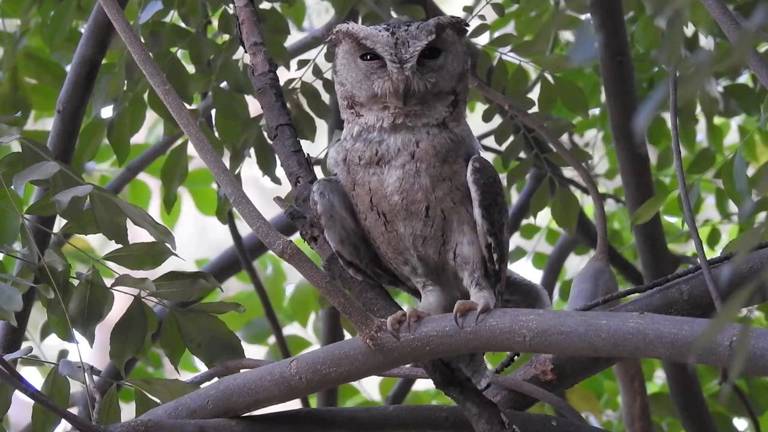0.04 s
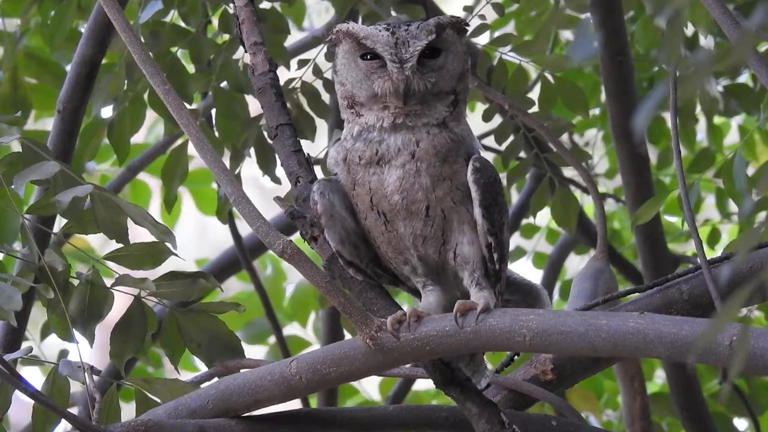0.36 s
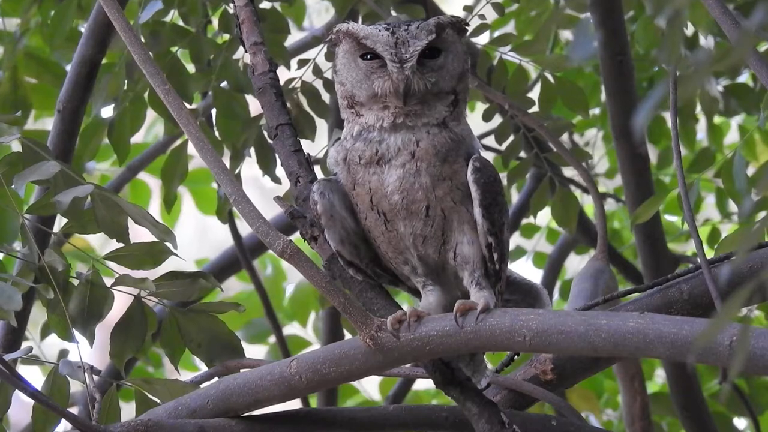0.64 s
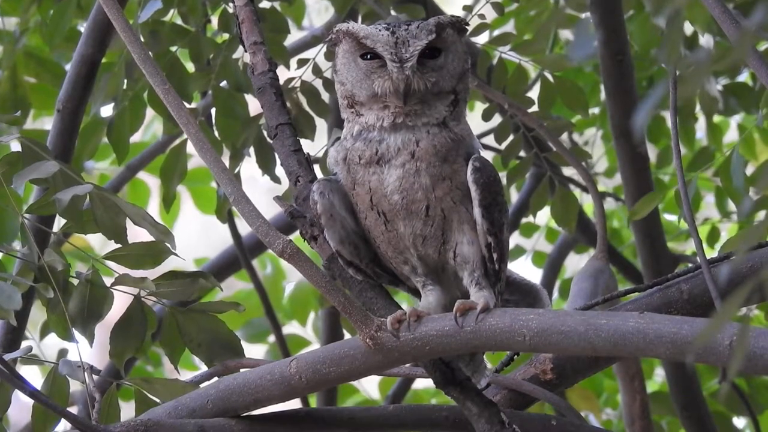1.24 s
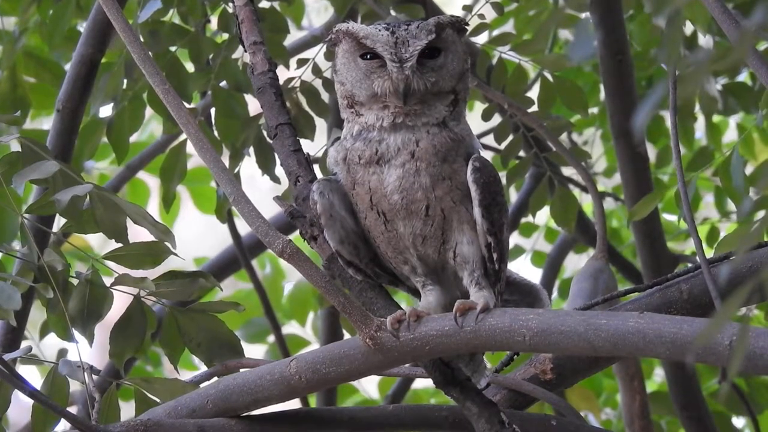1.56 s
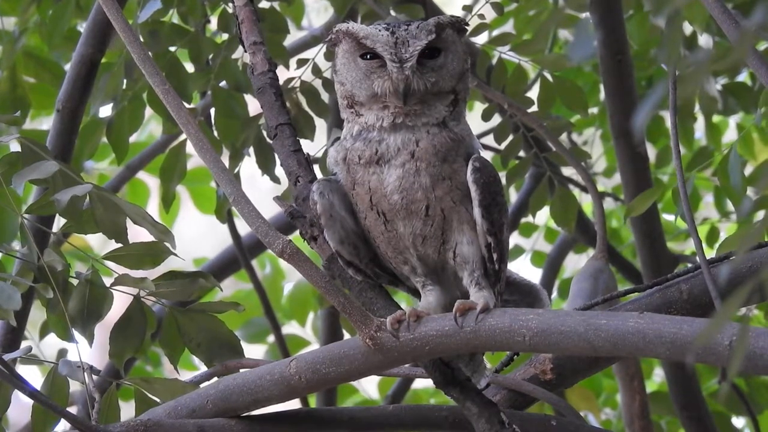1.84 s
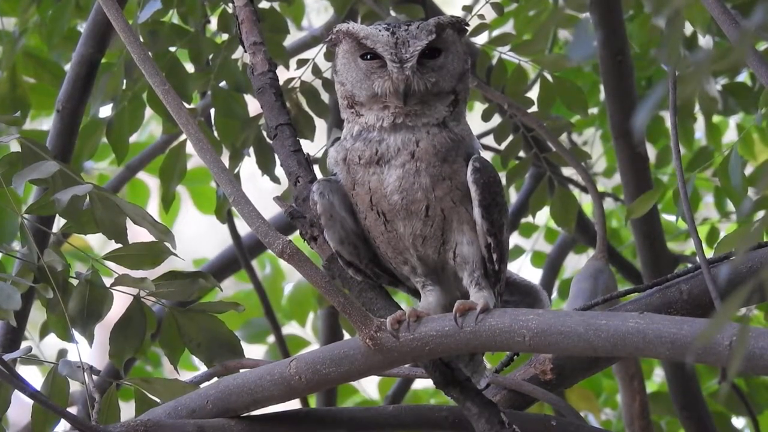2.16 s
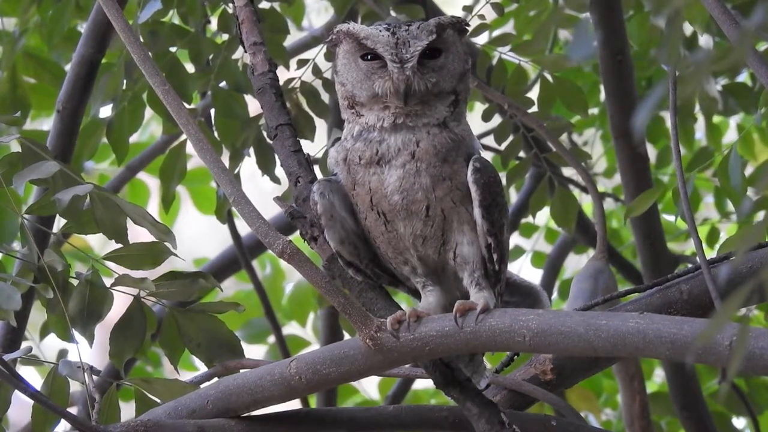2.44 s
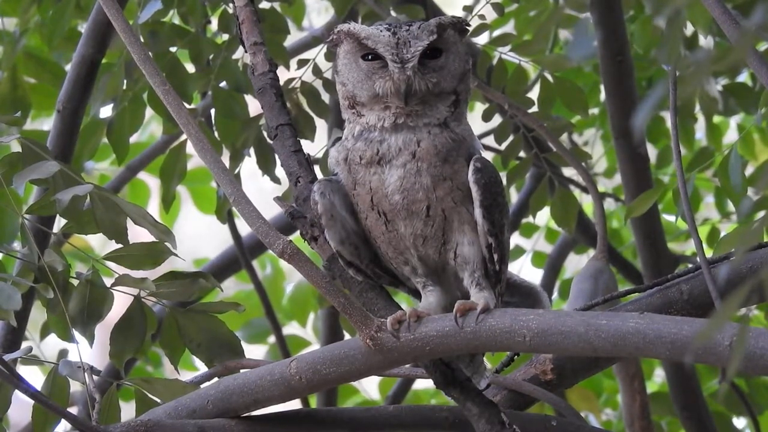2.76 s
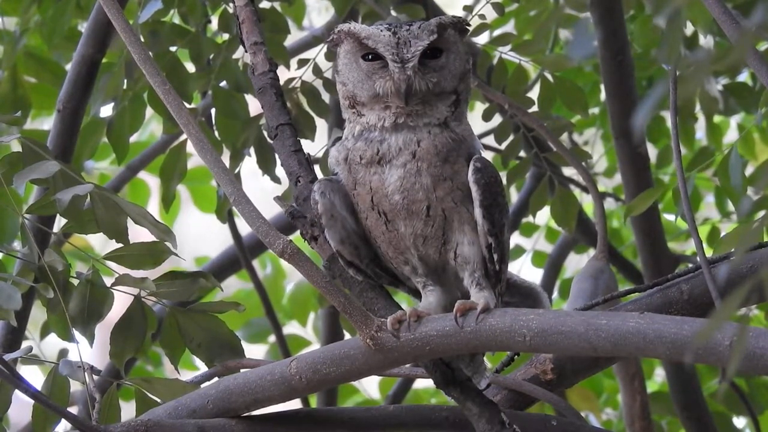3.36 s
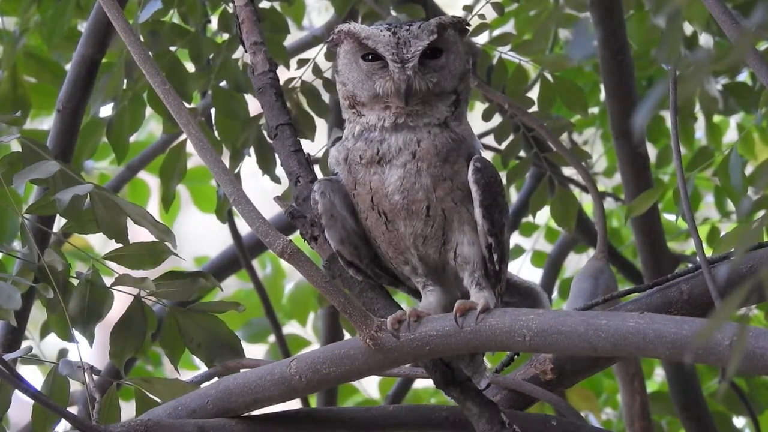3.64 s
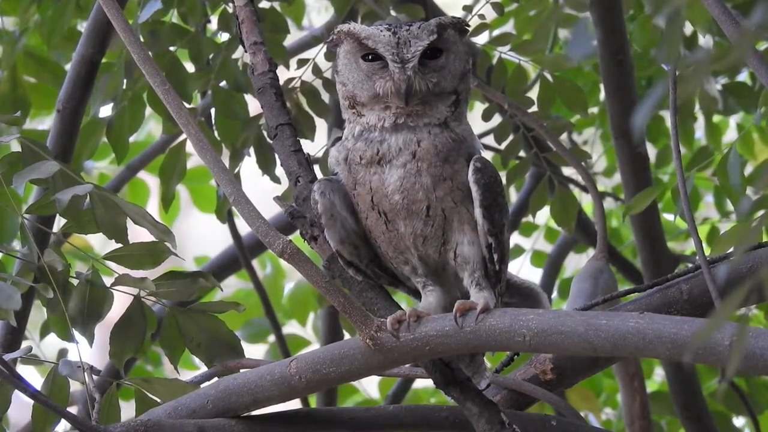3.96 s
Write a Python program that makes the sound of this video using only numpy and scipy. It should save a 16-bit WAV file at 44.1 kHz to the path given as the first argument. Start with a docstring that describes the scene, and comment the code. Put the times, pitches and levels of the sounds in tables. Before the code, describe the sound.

Four short, squeaky bird chirps repeat steadily outdoors, with far traffic and faint hiss behind.

```python
"""A bird gives four squeaky chirps, two slurred down and two arched, near a silent owl in a leafy tree.
Each chirp is a harmonic whistle shaped by the resonances of throat and beak, and scattering among the
trees prolongs it briefly. Fainter peeps come before and between the chirps. Distant traffic rumbles,
something brushes the leaves once, a twig clicks twice in damped modes, and the camera's lens
mechanism hisses and ticks softly."""
import sys
import numpy as np
from scipy import signal
from scipy.fft import rfft, irfft, next_fast_len
from scipy.io import wavfile
from scipy.ndimage import uniform_filter1d, map_coordinates

SR = 44100
rng = np.random.default_rng(int(sys.argv[2]) if len(sys.argv) > 2 else 0)


def dump(signal):
    """Clip the signal to [-1, 1] and save it as 16-bit WAV at the path in sys.argv[1]."""
    limited = np.clip(np.atleast_2d(signal).T, -1, 1)
    pcm = np.round(limited * 32767).astype(np.int16)
    wavfile.write(sys.argv[1], SR, pcm)


N = 176400

# spectra of traffic rumble, air, lens hiss, lens ticks and leaves: (frequency [Hz], relative level [dB])
RUMBLE_SPECTRUM = [(12, -49), (20, -28), (59, -3), (82, 1.5), (128, -3), (189, -12.5), (221, -19.5),
                   (262, -23.5), (300, -22.5), (390, -40), (660, -120)]
AIR_SPECTRUM = [(130, -32), (220, -2.5), (237, -4), (264, -5.5), (291, -3.5), (353, -0.5), (394, -5),
                (514, -0.5), (759, -4.5), (878, -8.5), (1430, -9.5), (1710, -13.5), (1860, -12),
                (2150, -15), (4000, -21.5), (5200, -32), (8800, -120)]
HISS_SPECTRUM = [(1500, -43), (3000, -5.5), (4500, -3.5), (6600, 3), (8000, 0.5), (8900, -2.5), (9500, -15),
                 (11000, -21), (15500, -32)]
TICK_SPECTRUM = [(2000, -24), (4500, -8), (5700, 2), (7000, 8), (8300, -6), (10000, -17.5), (15500, -37)]
BRUSH_SPECTRUM = [(300, -14), (1000, -7.5), (2400, -14), (3800, -4), (5300, 3), (7300, 2.5), (8800, -14),
                  (10500, -22.5), (15500, -43)]
# envelopes of rumble, air and brushed leaves: (time [s], level [dB])
RUMBLE_ENVELOPE = [(0, -31.5), (1.2, -32.5), (1.42, -29.5), (1.7, -33), (2.1, -32), (2.7, -31), (4, -30.5)]
AIR_ENVELOPE = [(0, -42), (1.2, -44), (2, -43), (3, -42.5), (4, -42.5)]
BRUSH_ENVELOPE = [(3.3, -64), (3.316, -36), (3.322, -29.5), (3.34, -29), (3.36, -33), (3.38, -35.5),
                  (3.4, -55), (3.47, -62)]
# left-right likeness of traffic and lens hiss: (frequency [Hz], correlation [-1 to 1])
TRAFFIC_CORRELATION = [(60, 1), (160, 0.99), (450, 0.96), (1200, 0.92), (2000, 0.72), (3500, 0.89)]
HISS_CORRELATION = [(3300, 0.53), (5500, 0.19), (7000, -0.22), (9000, -0.4), (15000, 0.26)]
# ticks of the lens: (centre time [s], duration [s], level [dB])
LENS_TICKS = [(0.162, 0.029, -42), (0.485, .012, -43), (.628, .012, -41), (0.905, .012, -37.5),
              (1.095, .012, -38), (1.326, .02, -41), (1.745, .02, -46), (1.962, 0.0097, -41),
              (2.082, .025, -44), (2.25, 0.022, -38), (2.295, 0.042, -42), (2.364, 0.046, -40.5),
              (2.592, 0.028, -38), (2.722, 0.033, -41.5), (2.807, 0.044, -40), (2.883, .04, -42),
              (3.02, 0.059, -36.5), (3.16, 0.1, -40.5), (3.22, 0.011, -42), (3.418, 0.059, -39),
              (3.656, 0.033, -40), (3.693, .03, -41), (3.866, 0.024, -37)]
# modes of the twig: (frequency [Hz], relative level [dB], time to decay by 60 dB [s])
TWIG_MODES = [(540, -14, .02), (1280, -11.5, 0.033), (1780, -5, 0.0066), (2200, -10, .008),
              (3040, -14, 0.013)]
# clicks of the twig: (time [s], gain [dB])
TWIG_CLICKS = [(2.4475, -25), (3.3075, -30)]
# faint peeps: (time [s], duration [s], pitch [Hz], glide [octaves], gain [dB],
# third harmonic relative to second at the source [dB], rasp [0-1])
PEEP_NOTES = [(.083, 0.0546, 1754, -0.078, -34, -19, 0.87), (.365, 0.026, 2227, 0.0049, -34, 8, 0.46),
              (.378, 0.023, 2830, -0.065, -40, -7, 0.6), (.53, 0.057, 1625, 0.177, -46.5, -8, .4),
              (.672, 0.048, 1599, -0.12, -41.5, -4, 0.05), (2.515, 0.043, 2010, 0.005, -46, -14, 0.3)]
# dull notes of far birds: (time [s], duration [s], pitch [Hz], glide [octaves], level [dB])
FAR_BIRD_NOTES = [(.8, 0.071, 1380, -0.078, -58), (0.924, .05, 1910, 0.0015, -51),
                  (.945, 0.097, 1497, -0.106, -50), (1.614, 0.059, 1760, -0.12, -51),
                  (2.972, 0.031, 1264, 0.062, -45.5), (3.118, 0.048, 1253, -0.061, -49)]
# resonances of throat and beak: (frequency [Hz], gain [dB])
THROAT_RESPONSE = [(1300, -4.5), (1900, -9), (2400, -8.5), (2800, -0.5), (3700, -2), (4700, -2.5),
                   (5400, 3.5), (6200, -16.5), (9500, -13), (12000, -32)]
# slurred and arched chirps: (time of pitch peak [s], peak pitch [Hz], gain [dB])
SLUR_CALLS = [(1.352, 2083, -24.5), (2.108, 2061, -25)]
ARCH_CALLS = [(2.937, 2331, -23), (3.692, 2400, -23.5)]
# pitch contours: (time from pitch peak [s], pitch over peak pitch [ratio])
SLUR_CONTOUR = [(-.075, .83), (-.045, .91), (0, 1), (.023, .96), (.043, .92), (.062, .89), (.078, .83),
                (.094, .745), (.11, .68)]
ARCH_CONTOUR = [(-.09, .68), (-.062, .78), (-.04, .82), (-.022, .94), (.003, 1), (.02, .965), (.034, .79),
                (.052, .6)]
# course of a chirp: (time from pitch peak [s], effort [dB], spectral tilt [dB per harmonic], rasp [0-1])
SLUR_COURSE = [(-.075, -23, -6, 0.53), (0, -17.5, -6, .2), (.023, -16, -5.5, 0.05), (0.042, -2, -2.5, 0.2),
               (0.061, -7.5, -7, 0.1), (0.079, -5, 6.5, .3), (0.093, -8.5, 5.5, 0.6), (.108, -19, 14, 0.3)]
ARCH_COURSE = [(-.09, -17.5, -4, 0.46), (-.062, -12, -3, 0.47), (-.04, -8, -4, 0.55),
               (-.022, -5.5, -2, 0.56), (.003, 0.5, -0.5, .3), (.02, -0.5, 3.5, .45),
               (0.033, -2.5, 0, 0.94), (.052, -6, 5, 1)]
# source harmonics, from the fundamental upward: (relative level [dB])
SLUR_HARMONICS = [-4.5, -1, 0.5, -5.5, -21]
ARCH_HARMONICS = [-4, 0.5, -6.5, -19, -24]

# random modulation of the voice: pitch depth as a fraction, level depth, knots a second
WAVER_JITTER, WAVER_DB, WAVER_RATE = 0.0054, 2.5, 260
RASP_JITTER, RASP_DB, RASP_RATE = 0.06, 3, 1300
BRANCHES_T60_S, BRANCHES_DB = 0.043, -2.5
TREES_T60_S, SCATTER_RISE_S, SCATTER_CORRELATION = 0.37, 0.0035, 0.82
BALANCE_DB = 0.6  # right over left


def amp(db):
    """Amplitude ratio: a factor of ten for every 20 dB."""
    return 10 ** (np.asarray(db) / 20)


def unit_rms(x):
    """Normalisation to unit mean power."""
    return x / np.sqrt(np.mean(x ** 2) + 1e-20)


def at_frequency(points, hz):
    """Interpolation of (frequency [Hz], value) points on a logarithmic axis."""
    knots_hz, values = np.transpose(points)
    return np.interp(np.log(hz + 1), np.log(knots_hz + 1), values)


def clock(size=N):
    """Uniform sampling: the time of each sample in seconds."""
    return np.arange(size) / SR


def wobble(rate, size=N):
    """Smooth random modulation: a spline through `rate` Gaussian knots a second."""
    return map_coordinates(rng.standard_normal(4096), [np.arange(size) * rate / SR], mode="wrap")


def filtered(x, response):
    """Linear filtering: the spectrum is multiplied by a frequency response."""
    size = next_fast_len(N + SR // 2)
    return irfft(rfft(x, size) * response(np.fft.rfftfreq(size, 1 / SR)), size)[..., :N]


def mid_side_gains(correlation):
    """The division of power between independent mid and side signals sets the left-right correlation."""
    angle = np.arccos(np.clip(correlation, -1, 1)) / 2
    return np.vstack([np.cos(angle), np.sin(angle)])


def noise(spectrum, correlation):
    """Spectral shaping of white noise gives partly coherent stereo noise of unit power."""
    def response(hz):
        return amp(at_frequency(spectrum, hz)) * mid_side_gains(at_frequency(correlation, hz))
    mid, side = filtered(rng.standard_normal((2, N)), response)
    return unit_rms(np.array([mid + side, mid - side]))


def add(track, start_s, sound):
    """Superposition: a sound adds to the track from its starting time."""
    part = track[:, max(round(start_s * SR), 0):][:, :sound.shape[-1]]
    part += sound[..., :part.shape[-1]]


def band_fading(x, depth_db):
    """Frequency-selective fading: narrow bands swell and fade independently."""
    bands = signal.stft(x, nperseg=2048)[2]
    fading = uniform_filter1d(rng.standard_normal(bands.shape[1:]), size=3, axis=0)  # over frequency
    fading = uniform_filter1d(fading, size=5, axis=1)  # over time
    faded = signal.istft(bands * amp(depth_db * unit_rms(fading)), nperseg=2048)[1]
    return unit_rms(faded[:, :N])


def distant_traffic():
    """Slowly modulated noise: a low rumble under a soft, broader wash of air."""
    rumble_db = np.interp(clock(), *np.transpose(RUMBLE_ENVELOPE)) + wobble(5.1)
    rumble = amp(rumble_db) * noise(RUMBLE_SPECTRUM, TRAFFIC_CORRELATION)
    air_db = np.interp(clock(), *np.transpose(AIR_ENVELOPE)) + 1.24 * wobble(12)
    air = amp(air_db) * band_fading(noise(AIR_SPECTRUM, TRAFFIC_CORRELATION), depth_db=1.9)
    return rumble + air


def lens_mechanism():
    """Amplitude modulation of treble noise: an uneven hiss, and Gaussian pulses for scratchy ticks."""
    t = clock()
    hiss = amp(-43 + 0.64 * wobble(35) + 0.13 * wobble(4)) * noise(HISS_SPECTRUM, HISS_CORRELATION)
    pulses = sum(amp(db) * np.exp(-2 * ((t - s) / length) ** 2) for s, length, db in LENS_TICKS)
    ticks = pulses * amp(1.1 * wobble(300)) * noise(TICK_SPECTRUM, correlation=[(7000, -0.3)])
    return hiss + ticks


def brushed_leaves():
    """Friction noise: one quick swish, made grainy by rapid amplitude modulation."""
    level_db = np.interp(clock(), *np.transpose(BRUSH_ENVELOPE), left=-120, right=-120)
    grain_db = 1.3 * wobble(500)
    return amp(level_db + grain_db) * noise(BRUSH_SPECTRUM, correlation=[(1000, 0.98), (8000, 0.93)])


def among_trees(x, trees_db):
    """Scattering: the direct sound gains a short tail from near branches and a longer one from trees."""
    t = clock(SR // 2)
    paths = 1. * (t == 0)
    for t60, db in (BRANCHES_T60_S, BRANCHES_DB), (TREES_T60_S, trees_db):
        envelope = amp(-60 * t / t60) * (1 - np.exp(-t / SCATTER_RISE_S))
        mid, side = rng.standard_normal((2, len(t))) * envelope * mid_side_gains(SCATTER_CORRELATION)
        paths = paths + amp(db) * np.array([mid + side, mid - side]) / np.linalg.norm([mid, side])
    return signal.fftconvolve(x[None], paths / np.linalg.norm(paths[0]), axes=1)


def twig():
    """Damped free vibration: the modes of a nearby twig die away so fast that they sound as a click."""
    out, t = np.zeros((2, N)), clock(SR // 10)
    ring = sum(amp(db - 60 * t / t60) * np.sin(2 * np.pi * hz * t) for hz, db, t60 in TWIG_MODES)
    for start_s, db in TWIG_CLICKS:
        add(out, start_s, amp(db) * ring)
        add(out, start_s, among_trees(amp(db + 0.5) * ring, trees_db=2))
    return out


def glide(hz, octaves, length_s):
    """Exponential sweep: the pitch passes through hz at a constant rate in octaves."""
    return hz * 2 ** (octaves * np.linspace(-.5, .5, round(length_s * SR)))


def bird_voice(pitch, effort_db, harmonics_db, rasp, tilt_db=0, ramp_s=0.0037):
    """Source and filter: harmonics sweep through the throat's resonances; rasp shakes pitch and level."""
    size = len(pitch)
    t = clock(size)
    jitter = WAVER_JITTER * wobble(WAVER_RATE, size) + RASP_JITTER * rasp * wobble(RASP_RATE, size)
    phase = 2 * np.pi * np.cumsum(pitch * (1 + jitter)) / SR
    tone = np.zeros(size)
    for k, db in enumerate(harmonics_db, 1):
        source_db = db + tilt_db * (k - 2)  # the tilt pivots on the second harmonic
        tone += amp(source_db + at_frequency(THROAT_RESPONSE, k * pitch)) * np.sin(k * phase)
    ramps = np.clip(np.minimum(t, t[-1] - t) / ramp_s, 0, 1)
    flutter_db = WAVER_DB * wobble(WAVER_RATE, size) + RASP_DB * rasp * wobble(RASP_RATE, size)
    return tone * ramps * amp(effort_db + flutter_db)


def peeps():
    """Attenuation with distance: short notes are faint, and the farthest keep only their fundamental."""
    out = np.zeros((2, N))
    for start_s, length_s, hz, octaves, db, third_db, rasp in PEEP_NOTES:
        note = bird_voice(glide(hz, octaves, length_s), db, harmonics_db=[-4.5, 0, third_db], rasp=rasp)
        add(out, start_s, among_trees(note, trees_db=3))
    for start_s, length_s, hz, octaves, db in FAR_BIRD_NOTES:
        note = bird_voice(glide(hz, octaves, length_s), effort_db=0, harmonics_db=[0], rasp=0.43)
        add(out, start_s, among_trees(amp(db) * unit_rms(note), trees_db=2))
    return out


def chirps(calls, contour, course, harmonics_db):
    """Frequency modulation: each chirp climbs to its peak pitch, then brightens and rasps as it falls."""
    out = np.zeros((2, N))
    times, *columns = np.transpose(course)
    t = np.arange(times[0], times[-1], 1 / SR)
    pitch_ratio = np.interp(t, *np.transpose(contour))
    effort_db, tilt_db, rasp = [np.interp(t, times, column) for column in columns]
    for peak_s, peak_hz, db in calls:
        chirp = bird_voice(peak_hz * pitch_ratio, db + effort_db, harmonics_db, rasp, tilt_db)
        add(out, peak_s + times[0], among_trees(chirp, trees_db=3))
    return out


def scene():
    """A level difference between the ears sets the outdoor sounds slightly right; the lens is central."""
    slurs = chirps(SLUR_CALLS, SLUR_CONTOUR, SLUR_COURSE, SLUR_HARMONICS)
    arches = chirps(ARCH_CALLS, ARCH_CONTOUR, ARCH_COURSE, ARCH_HARMONICS)
    outdoors = slurs + arches + peeps() + twig() + brushed_leaves() + distant_traffic()
    return outdoors * amp([[-BALANCE_DB / 2], [BALANCE_DB / 2]]) + lens_mechanism()


def record(dry):
    """Gating and band limiting: the sound enters after a moment, stops at the end and is low-passed."""
    start_s, fade_in_s, fade_out_s, cutoff_hz = 0.0741, 0.017, 0.003, 15740
    t = clock()
    gate = np.clip(np.minimum((t - start_s) / fade_in_s, (t[-1] - t) / fade_out_s), 0, 1)
    return filtered(dry * gate, lambda hz: hz < cutoff_hz)


dry = scene()
out = record(dry)
dump(out)
```